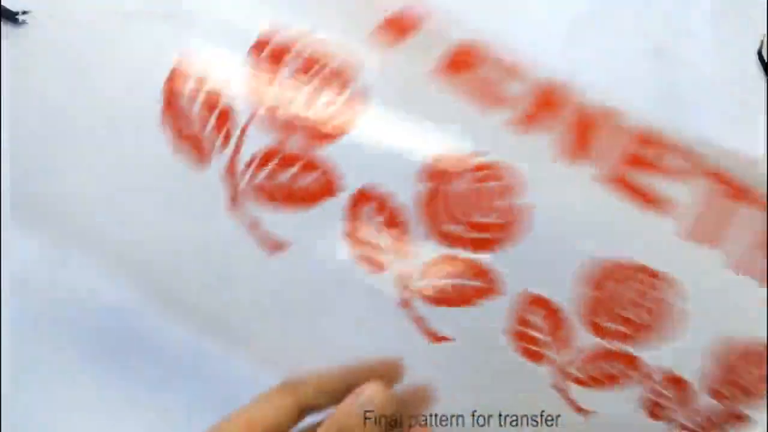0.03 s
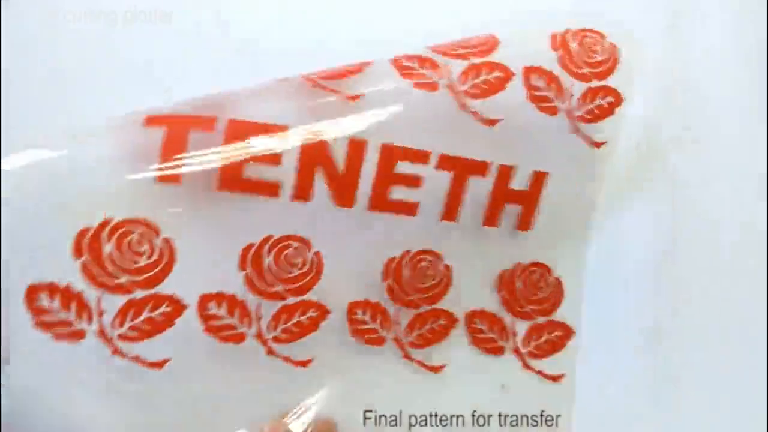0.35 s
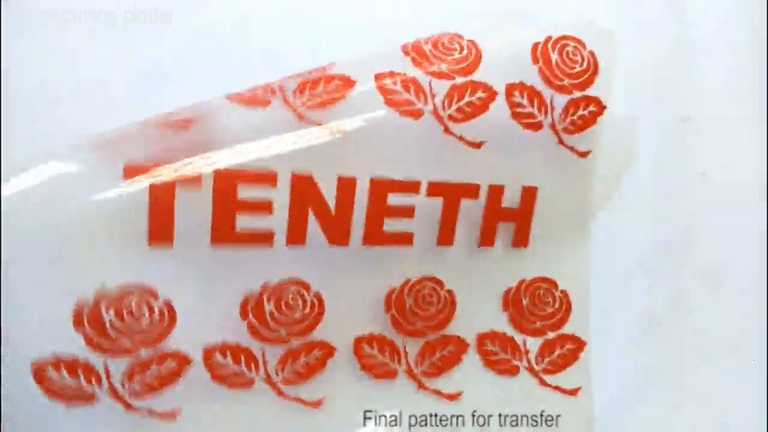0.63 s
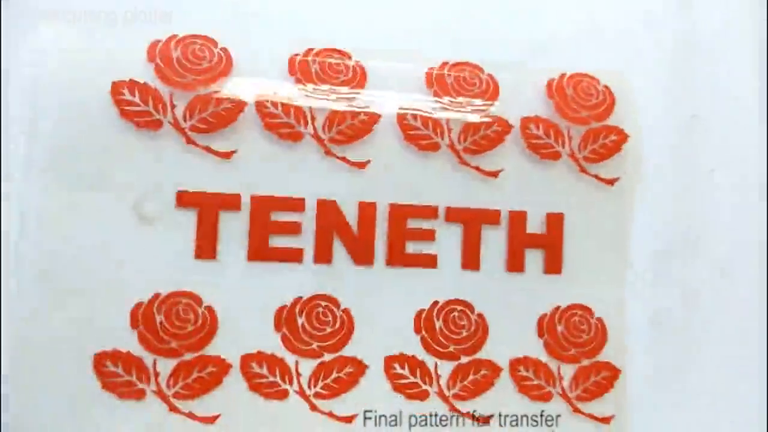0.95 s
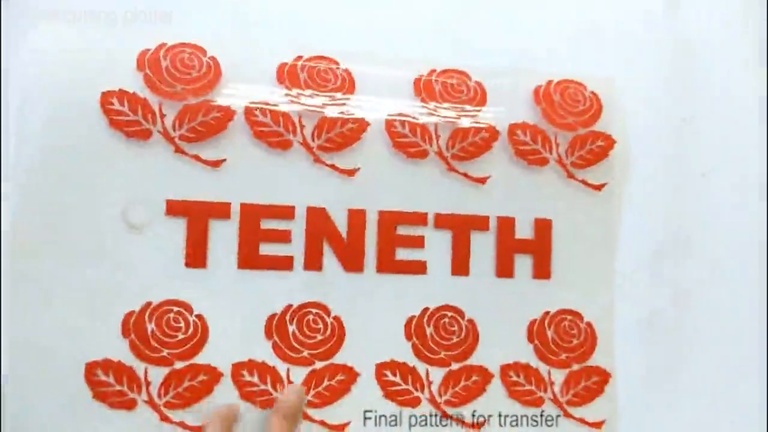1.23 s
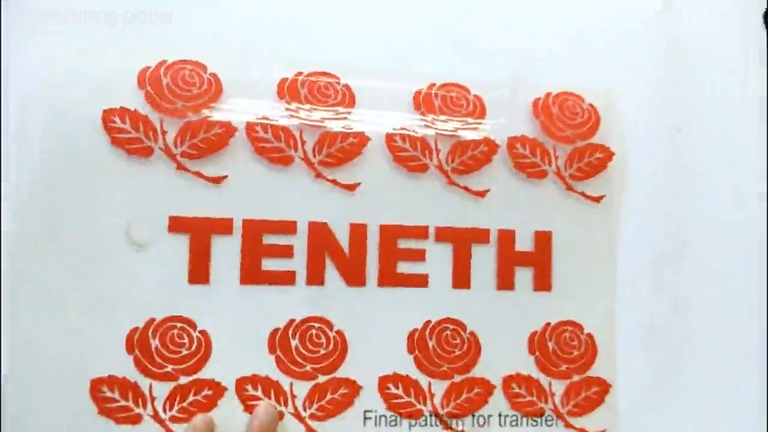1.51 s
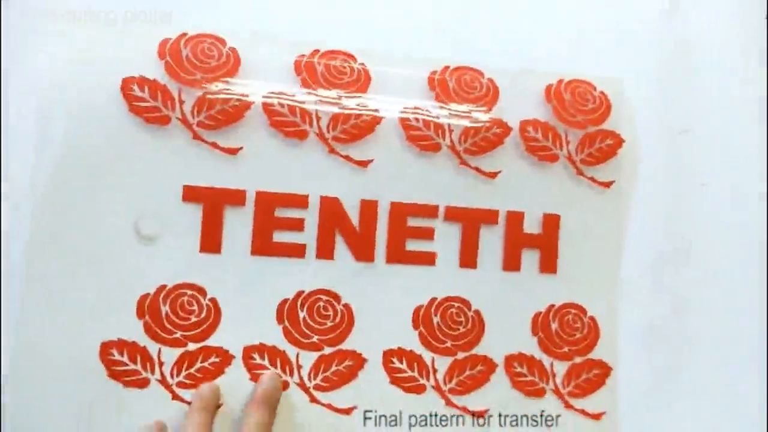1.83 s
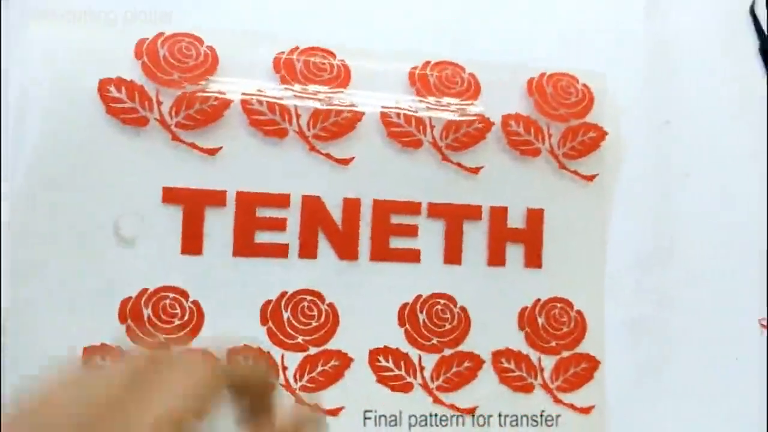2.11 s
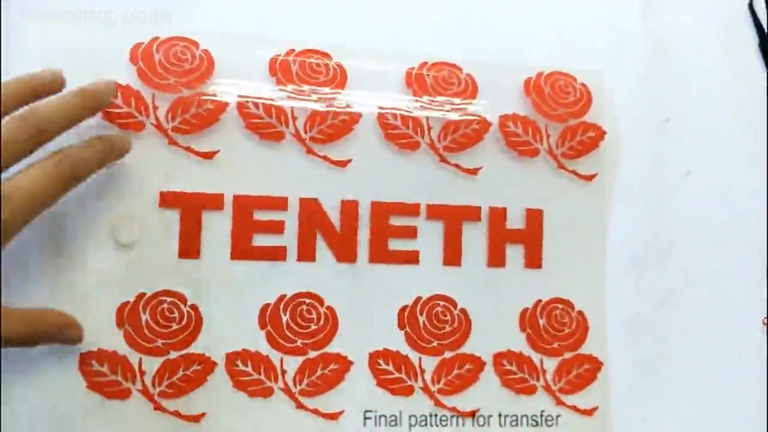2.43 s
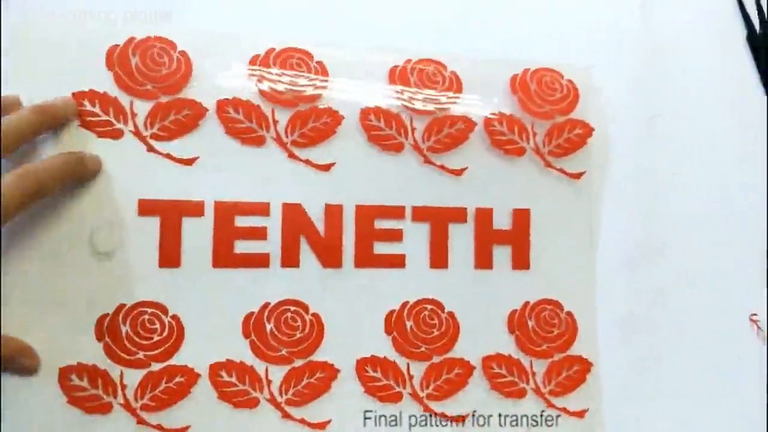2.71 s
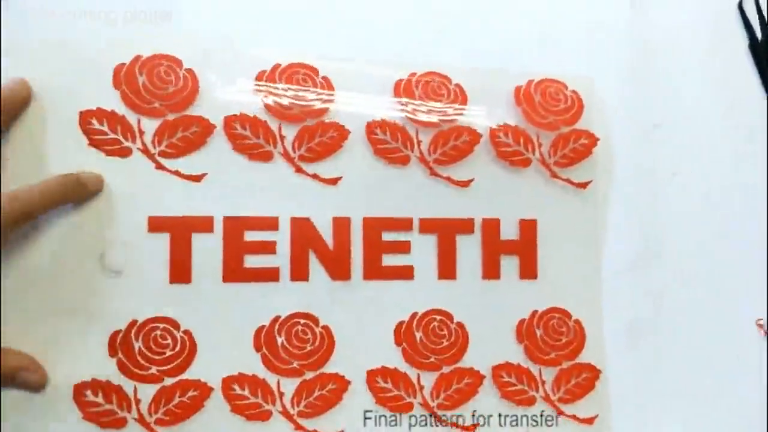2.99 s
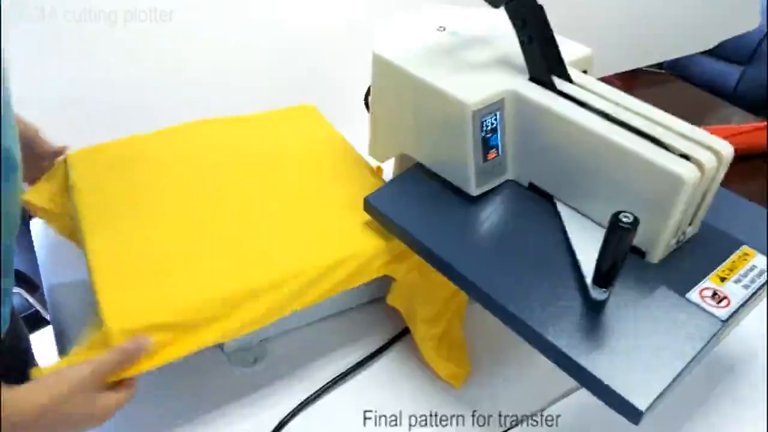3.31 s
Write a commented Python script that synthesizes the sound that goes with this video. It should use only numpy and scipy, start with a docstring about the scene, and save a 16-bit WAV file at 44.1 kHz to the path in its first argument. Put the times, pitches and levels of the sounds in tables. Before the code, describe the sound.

A plastic sheet buckles with a crackle and a sharp pop, followed by lighter crinkles, sliding swishes and two soft pats on a tabletop. Ventilation drones in the slightly echoing room, and a click ends it all.

```python
"""A hard-walled workroom drones: ventilation, two low tones, mains hum. A stiff plastic film is swung
over and laid on a table; it hisses, buckles with a crackle and one sharp pop, and the walls answer.
It settles in smaller crinkles and is slid and smoothed by hand, with thin swishes and two soft pats.
After a faint high tick the sound ends abruptly with a click."""
import sys
import numpy as np
from scipy import signal
from scipy.fft import rfft, irfft, next_fast_len
from scipy.io import wavfile
from scipy.ndimage import map_coordinates

SR = 44100
rng = np.random.default_rng(int(sys.argv[2]) if len(sys.argv) > 2 else 0)


def transcribe(u):
    """Save the signal u as a 16-bit wav file named by the first command-line argument.

    u: samples, shape (n,) or (channels, n), limited to [-1, 1]; the rate is SR.
    q: integer samples, one column per channel.
    """
    v = np.clip(np.atleast_2d(u).T, -1, 1)
    q = np.round(v * 32767).astype(np.int16)
    wavfile.write(sys.argv[1], SR, q)


N = 156555

# ventilation noise: (time [s], level [dB])
VENT_LEVEL = [(0, -50.5), (.4, -52), (1.4, -50.5), (2.3, -48.5), (3.25, -46)]
# ventilation colour: (frequency [Hz], gain [dB])
VENT_SPECTRUM = [(20, -16), (35, -11), (60, -0.5), (95, -4.5), (150, -2), (230, -4.5), (400, -12),
                 (950, -11.5), (1600, -16.5), (2800, -28), (3500, -41.5), (4400, -56.5), (5000, -69),
                 (9000, -79)]
# ventilation stereo image: (frequency [Hz], left-right coherence [0..1])
VENT_COHERENCE = [(60, 0.95), (130, 0.96), (290, 0.84), (640, 0.3), (1400, 0), (6000, 0.76)]
# room drones: (time [s], low drone level [dB], high drone level [dB])
DRONE_LEVELS = [(0, -57.5, -61.5), (.35, -56, -60.5), (.55, -57, -51.5), (1.2, -57, -55.5), (1.8, -53, -58),
                (2.4, -54, -56.5), (2.52, -49, -54), (2.9, -49.5, -56.5), (3.25, -47.5, -60.5)]
# pushes of the film: (peak time [s], rise [s], fall [s], hiss level [dB], fizz level [dB])
PUSHES = [(0.0, .02, 0.072, -58.5, -78), (0.208, 0.0024, 0.19, -52, -65.5),
          (0.303, 0.016, 0.05, -45.5, -60), (0.501, 0.072, 0.11, -60.5, -78),
          (0.645, 0.0039, 0.16, -58, -72), (0.76, 0.06, 0.14, -61.5, -76),
          (0.836, 0.042, 0.041, -52.5, -58.5), (0.932, 0.008, 0.039, -51.5, -62),
          (1.068, 0.028, 0.013, -47.5, -57.5), (1.11, .1, 0.065, -63, -75.5),
          (1.728, .004, 0.077, -59.5, -72), (1.797, 0.03, .024, -54.5, -63),
          (1.97, 0.056, 0.065, -64.5, -82.5), (2.625, 0.028, 0.09, -61, -78),
          (2.875, 0.035, 0.08, -66, -89.5), (3.0, 0.054, 0.076, -70.5, -97), (3.211, .04, 0.078, -70, -97)]
# sliding hiss: (frequency [Hz], gain [dB])
HISS_SPECTRUM = [(200, -18.5), (900, -6.5), (1700, -7), (2200, 4), (3200, 5.5), (4100, 2.5), (4900, -9.5),
                 (7500, -23), (10000, -35.5), (12000, -48.5), (16000, -59)]
# fine sliding fizz: (frequency [Hz], gain [dB])
FIZZ_SPECTRUM = [(2000, -23.5), (4500, -7), (5700, 13.5), (8200, 8.5), (10000, -2), (12000, -16),
                 (15500, -27)]
# stereo image of friction and room tail: (frequency [Hz], left-right coherence [0..1])
FILM_COHERENCE = [(200, 1), (650, 0.93), (1500, .1), (6000, 0.081)]
# wall reflection: (frequency [Hz], gain [dB])
WALL_RESPONSE = [(60, -20), (250, -3), (800, 0), (1800, 0), (3000, -1.5), (5000, 0), (12000, -2.5)]
# room decay: (frequency [Hz], T60 [s])
ROOM_T60 = [(150, 0.98), (1000, 0.92), (3000, 0.79), (5500, 0.61), (8000, 0.31), (15000, 0.31)]
# film snaps, and one faint high tick just before the closing click:
# (time [s], level [dB], pitch [Hz], decay [cycles])
SNAPS_AND_TICK = [(.2055, -27, 2012, 0.23), (.2065, -40, 898, 0.16), (.2128, -31, 1250, 0.2),
                  (.2185, -22.5, 850, 0.14), (.231, -29, 800, 0.35), (0.2365, -21, 1129, 0.35),
                  (0.246, -23.5, 1002, 0.21), (.2495, -29, 1900, 0.19), (.2775, -33, 2484, 0.13),
                  (.2798, -29, 2200, 0.31), (0.2865, -26, 1111, 0.23), (.2892, -31, 2700, 0.3),
                  (0.2968, -10.5, 1550, 0.21), (.2979, -16, 2400, 0.36), (.2984, -18.5, 850, 0.34),
                  (0.3022, -23, 5615, 0.25), (.3755, -29, 900, 0.4), (.38, -32.5, 1900, 0.33),
                  (.6425, -40.5, 3600, 0.46), (.644, -32.5, 1750, .7), (.6475, -47.5, 5500, 0.22),
                  (.842, -35, 870, 0.27), (.924, -36.5, 1124, .45), (1.065, -25.5, 2960, .55),
                  (1.415, -58, 3420, 1), (1.7237, -37, 1600, 1), (1.974, -47.5, 2330, 0.43),
                  (1.979, -49.5, 6600, 0.39), (2.6486, -31, 1875, 0.35), (2.6505, -42.5, 3120, 1),
                  (2.654, -48, 6400, 0.27), (3.205, -51, 3440, 1), (3.257, -48.5, 6500, .12)]
# sheet flexes: (start [s], length [s], level [dB], pitch [Hz], spread [octaves], decay [cycles])
SHEET_FLEXES = [(0.206, 0.075, -37, 1080, 0.64, 0.24), (0.277, 0.023, -35, 1390, 0.71, 0.23),
                (0.3, 0.011, -37.5, 780, 0.63, 0.21), (0.375, 0.013, -45, 1000, 0.62, 0.23),
                (0.644, 0.02, -42.5, 1150, 0.57, 0.26), (0.839, 0.012, -42.5, 770, 0.63, 0.18),
                (0.922, 0.027, -42.5, 1184, 0.24, 0.62), (1.009, 0.069, -48.5, 1760, 0.42, 0.39),
                (1.058, .011, -38.5, 3107, 0.17, 0.75), (1.055, 0.013, -43, 424, 0.38, 0.8),
                (1.066, 0.014, -47, 1620, 0.12, .8), (1.723, 0.084, -51.5, 1710, 0.22, 1.2),
                (1.725, 0.072, -52.5, 2880, 0.13, 0.52)]
# crackle colour, with hollow mid-range peaks: (frequency [Hz], gain [dB])
CRACKLE_COLOUR = [(100, -12.5), (380, -1.5), (560, -6), (780, 3), (1150, -3), (1500, 1), (2250, -1.5),
                  (2700, 2), (3400, 2.5), (4000, -2.5), (5600, 3.5), (8000, -2), (10000, -17), (15500, -35)]
# film skimming the table: (peak time [s], half width [s], level [dB])
SKIMS = [(.228, .025, -68), (.826, .042, -64.5), (.945, .025, -79), (1.798, .03, -74.5)]
# skimming swish: (frequency [Hz], gain [dB])
SKIM_SPECTRUM = [(6000, -36.5), (10000, -13), (12500, -6), (14000, -4.5), (15500, 0)]
# sheet and hand patting the table: (time [s], level [dB], pitch [Hz])
TABLE_PATS = [(1.054, -44, 167), (2.782, -35.5, 156)]


def amp(db):
    """dB to gain."""
    return 10 ** (np.asarray(db) / 20)


def pan(db):
    """Stereo gains: left up by db, right down by db."""
    return amp([[db], [-db]])


def unit(x):
    """Scale to rms 1."""
    return x / np.sqrt(np.mean(x ** 2) + 1e-20)


def along(points, hz):
    """Interpolate (Hz, value) points on a log axis."""
    knots_hz, values = np.transpose(points)
    return np.interp(np.log(hz + 1), np.log(knots_hz + 1), values)


def clock():
    """Sample times [s]."""
    return np.arange(N) / SR


def curves(rows):
    """One per-sample curve for each column after the time."""
    time_s, *columns = np.transpose(rows)
    return [np.interp(clock(), time_s, column) for column in columns]


def wobble(rate_hz):
    """Smooth random curve, rms 1, rate_hz knots a second."""
    return unit(map_coordinates(rng.standard_normal(N // 8), [clock() * rate_hz], mode="wrap"))


def filtered(x, response):
    """Zero-phase filter with gain response(hz)."""
    size = next_fast_len(x.shape[-1] + 8192)
    return irfft(rfft(x, size) * response(np.fft.rfftfreq(size, 1 / SR)), size)[..., :x.shape[-1]]


def stereo_noise(spectrum, coherence):
    """Noise of rms 1 with given colour and left-right coherence."""
    def mid_side_gains(hz):
        angle = np.arccos(np.clip(along(coherence, hz), -1, 1)) / 2
        return amp(along(spectrum, hz)) * [np.cos(angle), np.sin(angle)]
    mid, side = filtered(rng.standard_normal((2, N)), mid_side_gains)
    return unit(np.array([mid + side, mid - side]))


def drone(hz, width_hz):
    """Narrow noise band wavering around one pitch."""
    phase = 2 * np.pi * hz * clock()
    return unit(wobble(2 * width_hz) * np.cos(phase) + wobble(2 * width_hz) * np.sin(phase))


def background(hum_hz=49.3, hum_db=-61):
    """Dull ventilation noise, two low drones and mains hum."""
    vent_db, = curves(VENT_LEVEL)
    low_db, high_db = curves(DRONE_LEVELS)
    drones = amp(low_db) * drone(hz=124.5, width_hz=16) + amp(high_db) * drone(hz=193.3, width_hz=11)
    vent = amp(vent_db) * stereo_noise(VENT_SPECTRUM, VENT_COHERENCE)
    hum = amp(hum_db) * unit(np.sin(2 * np.pi * hum_hz * clock()))
    return vent + drones + hum


def roughness(depth_db=2, rate_hz=150):
    """Gain flutter that makes friction grainy."""
    return amp(depth_db * wobble(rate_hz))


def slides():
    """Friction hiss swells and dies with each push; fast pushes add a fine fizz."""
    t = clock()
    peak_s, rise_s, fall_s, hiss_db, fizz_db = np.transpose(PUSHES)[:, :, None]
    pushes = np.exp(-abs(t - peak_s) / np.where(t < peak_s, rise_s, fall_s))
    rough = roughness()
    out = np.zeros((2, N))
    for db, spectrum in ((hiss_db, HISS_SPECTRUM), (fizz_db, FIZZ_SPECTRUM)):
        envelope = np.linalg.norm(amp(db) * pushes, axis=0)  # pushes add in power
        out += envelope * unit(rough * stereo_noise(spectrum, FILM_COHERENCE))
    return out


def room(film, delay_s=0.004):
    """Diffuse tail: each wall gets a different waveform; each frequency dies at its own rate."""
    magnitude = abs(signal.stft(film[0], nperseg=128)[2])
    random_phase = np.exp(2j * np.pi * rng.random(magnitude.shape))
    diffuse = signal.istft(magnitude * random_phase, nperseg=128)[1][:N]
    reflected = filtered(unit(diffuse) * np.std(film[0]), lambda hz: amp(along(WALL_RESPONSE, hz)))
    white = stereo_noise([(1, 0)], FILM_COHERENCE)[:, :SR]
    hz, t, bins = signal.stft(white, SR, nperseg=256)
    decay = amp(-60 * t / along(ROOM_T60, hz)[:, None])
    tail = signal.istft(bins * decay, SR, nperseg=256)[1]
    tail = np.pad(tail / np.linalg.norm(tail[0]), ((0, 0), (int(delay_s * SR), 0)))
    return signal.fftconvolve(reflected[None], tail, axes=1)[:, :N]


def snaps(time_s, size, hz, decay_cycles, lag_s):
    """Heavily damped swings, lag_s later on the right."""
    index = (time_s * SR).astype(int)[:, None] + np.arange(-SR // 1000, SR // 100)
    channels = []
    for onset_s in (time_s - lag_s / 2, time_s + lag_s / 2):
        cycles = np.maximum(index / SR - onset_s[:, None], 0) * hz[:, None]
        age = cycles / np.reshape(decay_cycles, (-1, 1))
        envelope = (age / 2 * np.exp(1 - age / 2)) ** 2
        swing = size[:, None] * envelope * np.sin(2 * np.pi * cycles)
        channels.append(np.bincount(np.clip(index, 0, N - 1).ravel(), swing.ravel(), N))
    return np.array(channels)


def pops(echo_s=0.0011, echo_db=-7, echo_pitch_ratio=0.62):
    """Single film snaps, to the left, each with a duller table echo; last, one faint high tick."""
    time_s, db, hz, decay_cycles = np.transpose(SNAPS_AND_TICK)
    direct = snaps(time_s, amp(db), hz, decay_cycles, lag_s=0.00025) * pan(db=3.5)
    echo = snaps(time_s + echo_s, amp(db + echo_db), hz * echo_pitch_ratio, decay_cycles, lag_s=3e-5)
    return direct + echo


def crinkles(grains_per_s=2200, max_grains=400, scatter_db=3, attack_s=0.00074, release_s=0.0036):
    """Each flex sets off a dense run of small buckles; a taut patch rings longer, almost a squeak."""
    out = np.zeros((2, N))
    for start_s, length_s, db, centre_hz, spread_oct, decay_cycles in SHEET_FLEXES:
        span_s = length_s + 2 * release_s
        count = int(np.clip(grains_per_s * span_s, 2, max_grains))
        jitter, size_draw = rng.random((max_grains, 2))[:count].T
        pitch_draw, lag_draw = rng.standard_normal((max_grains, 2))[:count].T
        polarity = rng.choice([-1, 1], max_grains)[:count]
        age_s = span_s * (np.arange(count) + jitter) / count
        envelope = np.minimum(age_s / attack_s, 1) * np.exp(-np.maximum(age_s - length_s, 0) / release_s)
        hz = centre_hz * 2 ** (spread_oct * 1.6 * np.tanh(pitch_draw / 1.6))  # within 1.6 spreads
        size = envelope * amp(-scatter_db * np.log(1 - size_draw)) * np.sqrt(hz / centre_hz)
        lag_s = 0.0001 + 0.00028 * lag_draw
        run = snaps(start_s + age_s, polarity * size, hz, decay_cycles, lag_s)
        out += amp(db) * unit(run) * np.sqrt(length_s * SR / N)
    return out


def swishes():
    """On the fastest pushes the film skims the table: a thin, very high swish."""
    peak_s, half_width_s, db = np.transpose(SKIMS)[:, :, None]
    envelope = np.sum(amp(db) / (1 + ((clock() - peak_s) / half_width_s) ** 2) ** 2, axis=0)
    return envelope * unit(roughness() * stereo_noise(SKIM_SPECTRUM, FILM_COHERENCE))


def pats(attack_s=0.00075, decay_s=0.0093):
    """Sheet and hand strike the table top: short, dull thuds."""
    out = np.zeros(N)
    for time_s, db, hz in TABLE_PATS:
        age_s = np.maximum(clock() - time_s, 0)
        envelope = 2 * (1 - np.exp(-age_s / attack_s)) * np.exp(-age_s / decay_s)
        out += amp(db) * envelope * np.sin(2 * np.pi * hz * age_s)
    return out


def scene(room_db=-13):
    """Film, room tail and pats over the background."""
    crackle = filtered(crinkles() + pops(), lambda hz: amp(along(CRACKLE_COLOUR, hz)))
    film = crackle + slides() + swishes()
    return film * pan(db=-0.2) + amp(room_db) * room(film) + pats() + background() * pan(db=0.26)


def record(dry, stop_s=3.2756, click_db=-10, top_hz=16100, edge_hz=400):
    """The sound stops abruptly with a click; nothing passes above top_hz."""
    click = amp(click_db) * (np.arange(N) == round(stop_s * SR))
    gated = dry * (clock() < stop_s)
    return filtered(gated + click, lambda hz: np.clip((top_hz - hz) / edge_hz, 0, 1))


dry = scene()
out = record(dry)
transcribe(out)
```